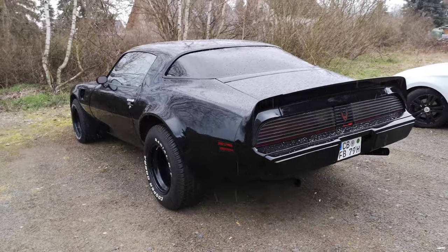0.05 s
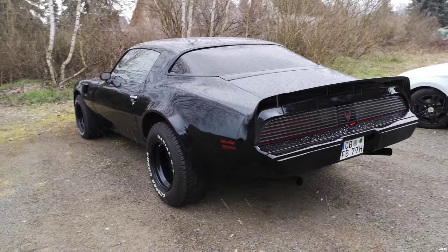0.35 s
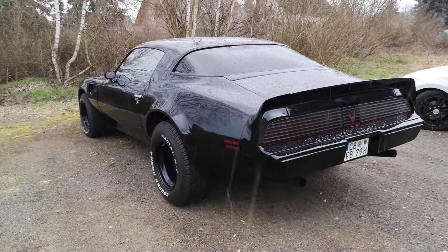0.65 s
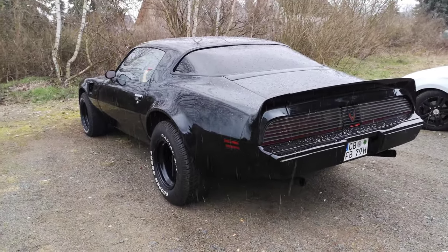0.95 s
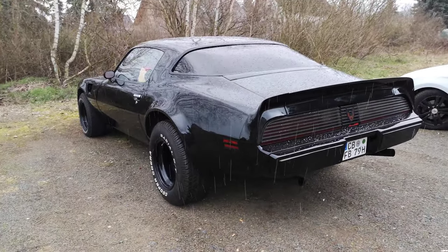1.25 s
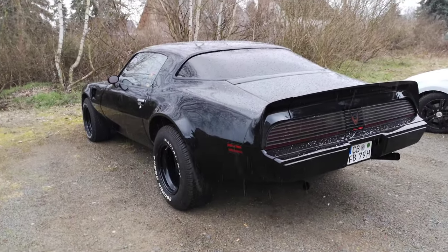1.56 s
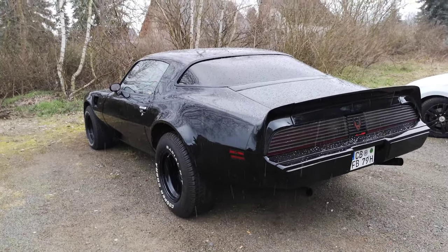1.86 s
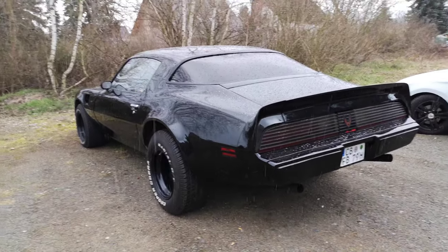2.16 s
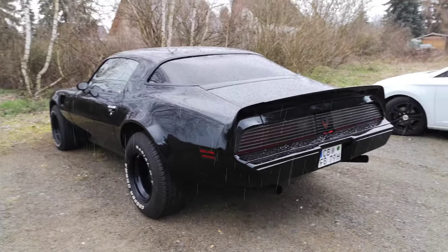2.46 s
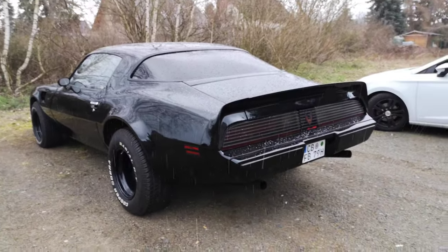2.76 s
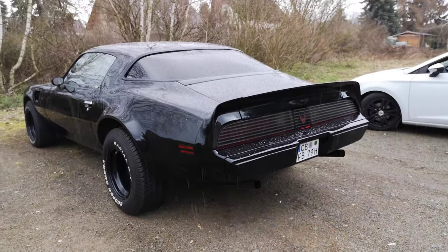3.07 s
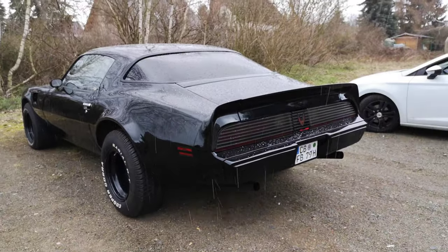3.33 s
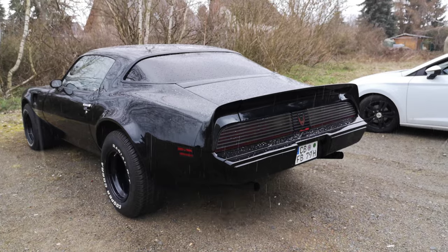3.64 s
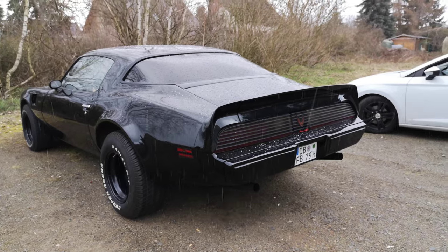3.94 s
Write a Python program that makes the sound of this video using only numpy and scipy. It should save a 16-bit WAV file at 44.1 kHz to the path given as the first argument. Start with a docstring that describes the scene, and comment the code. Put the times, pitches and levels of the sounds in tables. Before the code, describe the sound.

A car starter cranks and the engine fires after light wind gusts outdoors.

```python
"""An old V8 coupe starts up, heard from behind on a wet gravel lot.
Its starter slams in and whines, slowing each time a cylinder squeezes its air. A cylinder catches
with a clank, and the first firings thump and rasp out of the tailpipes. Before the start, gusts
buffet the microphone and a few raindrops tick over faint scuffs, a whirr and outdoor hiss."""
import sys
import numpy as np
from scipy import signal
from scipy.fft import rfft, irfft, next_fast_len
from scipy.io import wavfile
from scipy.ndimage import uniform_filter1d, map_coordinates

SR = 44100
rng = np.random.default_rng(int(sys.argv[2]) if len(sys.argv) > 2 else 0)


def unload_audio(sound):
    """Save the sound as a 16-bit wav file, at the path given as the first command line argument."""
    columns = np.transpose(np.atleast_2d(sound))
    # keep every value between -1 and 1, then stretch to whole-number steps
    steps = np.round(np.clip(columns, -1, 1) * 32767)
    wavfile.write(sys.argv[1], SR, steps.astype(np.int16))


N = 176400
T = np.arange(N) / SR

# A "colour" says how strong each pitch is in a noise. A fade time (t60) is the time to drop 60 dB.
# how fast the starter's gear teeth meet (time [s], tooth rate [Hz])
TOOTH_RATE = [(3.48,450),(3.53,865),(3.58,1100),(3.618,1190),(3.64,1148),(3.672,1030),(3.706,955),(3.746,1105),(3.766,1238),(3.78,1272),(3.802,1225),(3.835,1060),(3.88,1290),(4.0,1400)]
# how hard the starter works (time [s], level [dB])
EFFORT = [(3.475,-100),(3.485,-34.5),(3.54,-30.5),(3.61,-35.5),(3.66,-32),(3.71,-35.5),(3.79,-34.5),(3.83,-33.5),(3.89,-27.5),(4.0,-25.5)]
# the whine swells as each compression loads the teeth (time [s], level [dB])
WHINE_LEVEL = [(3.48,-140),(3.505,-55),(3.535,-40),(3.59,-39.5),(3.62,-39.5),(3.66,-33),(3.71,-39.5),(3.745,-37),(3.785,-36.5),(3.81,-36),(3.84,-32),(3.88,-44),(4.0,-39)]
# the tones in the whine (pitch [times the tooth rate], level [dB])
WHINE_TONES = [(.53,-25),(.74,-24),(.82,-11),(.92,-9.5),(1,-5),(1.09,-13),(1.35,-19),(1.85,-13),(2,-4.5),(2.12,-16),(2.88,-21),(3,-11.5),(4,-26),(5.3,-28)]
# teeth grinding together (pitch [Hz], level [dB])
GRIND_COLOUR = [(180, -51), (300, -48), (422, -30), (455, -29), (569, -3.5), (690, -47), (850, -19.5),
                (1060, -15), (1230, -2), (1350, -13.5), (1610, -8), (1790, -13.5), (2050, -3), (2200, -5),
                (2480, -4.5), (2750, -11), (3650, -12), (4370, -20.5), (5800, -16), (7690, -21),
                (10500, -40), (13700, -52), (22000, -120)]
# ring of the metal housing around the gears (pitch [Hz], level [dB], fade time [s])
HOUSING_RING = [(872,-5,0.1),(1040,-4,0.1),(1235,4,0.03),(1370,-6,0.08),(1660,-2,0.07),(1825,-3,0.07),(1960,9,0.035),(2090,2,0.08),(2467,5,0.09),(2620,4,.06)]
# the starter's small gear slams into the engine's big flywheel (time [s], level [dB], fade time [s])
SLAMS = [(3.4783,-18.5,0.2),(3.502,-17,0.09),(3.632,-35,0.18)]
# the noise of a slam (pitch [Hz], level [dB])
SLAM_COLOUR = [(180, -38), (300, -18), (343, -20), (560, -15), (701, -32), (838, -17), (1470, -11),
               (1660, 1), (1790, 0), (2080, 2.5), (2270, -7), (2480, 3.5), (2880, -17), (4000, -12),
               (4430, -14.5), (7800, -18), (10500, -45), (13700, -51), (22000, -120)]
# ring of the starter's nose after a slam (pitch [Hz], level [dB], fade time [s])
NOSE_RING = [(517,-15,0.21),(581,-14.5,0.22),(876,-15,0.26),(1348,-12,.15),(1672,-5,0.12),(1930,7,0.052),(2103,-1.5,0.13),(2460,-2.5,0.17),(2684,-10,.12),(4000,-14,.14),(5960,-13,.095),(6800,-16,.13)]
# the gears clank as the engine catches (time [s], level [dB], fade time [s])
CLANKS = [(3.8396,-15,0.15),(3.8535,-10.5,0.043)]
# the noise of a clank (pitch [Hz], level [dB])
CLANK_COLOUR = [(180, -47), (300, -25.5), (650, -18), (958, -10.5), (1060, -3), (1350, -3.5), (2020, 2.5),
                (2170, 2), (2410, -13), (2750, -17), (3150, -23), (3440, -35), (3650, -31), (4640, -41),
                (5070, -15), (6630, -20), (7250, -25), (7920, -27), (8280, -21), (9190, -15.5),
                (10500, -36), (13700, -63), (22000, -120)]
# the bright edge of a clank (pitch [Hz], level [dB])
CLANK_EDGE = [(3000, -44), (5000, -10), (9300, -6), (11000, -15), (15000, -18)]
# ring of the flywheel's gear after a clank (pitch [Hz], level [dB], fade time [s])
FLYWHEEL_RING = [(1054,-4,0.062),(1355,-8,.08),(1680,0,.07),(1845,-2,.06),(2060,5,0.089),(2220,-2,.06)]
# how much louder the engine bay is on the left (pitch [Hz], left minus right [dB])
BAY_BALANCE = [(200,-8),(550,1.5),(1030,8),(1800,6),(3200,0),(5700,5),(10000,4)]

# the engine shakes as it turns over (time [s], level [dB])
SHUDDER_LEVEL = [(3.495,-85),(3.515,-28),(3.56,-26.5),(3.62,-32),(3.665,-27.5),(3.72,-35.5),(3.8,-35.5),(3.85,-35.5),(3.92,-31),(4.0,-14)]
# the rumble of that shaking (pitch [Hz], level [dB])
SHUDDER_COLOUR = [(20,-7),(42,9.5),(75,-1.5),(120,-2.5),(170,-2),(230,-9),(320,-45),(420,-28.5),(530,-29.5),(700,-52),(1200,-93)]
# firings leave the tailpipes (time [s], thump level [dB], bark level [dB], hiss level [dB])
FIRINGS = [(3.9005,-18,-38,-34),(3.928,-6,-23.5,-22),(3.9516,-0.5,-16.5,-16),(3.974,-3,-17.5,-15.5),(3.9948,-1.5,-17.5,-18)]
# the low bark of a firing (pitch [Hz], level [dB])
BARK_COLOUR = [(120,5),(230,4.5),(330,-10),(480,-18),(640,-24),(720,-5),(860,1.5),(1050,-16.5),(1600,-4),(2400,-5.5),(3100,-5),(4000,-22),(6000,-40)]
# the hiss of escaping gas (pitch [Hz], level [dB])
GAS_COLOUR = [(1000,-50),(4100,-27),(4700,-4),(5500,-3.5),(5880,4.5),(6400,-10),(7300,-9.5),(8300,-4.5),(9000,-17),(10200,-17.5),(11500,-31.5),(15000,-36)]
# ring of the tailpipes (pitch [Hz], level [dB], fade time [s])
PIPE_RING = [(851,1,0.054),(1594,2,0.035),(1703,-3,.05),(1950,-5.5,.06),(2340,1,.06),(2650,0.5,0.052)]
# the crack of fuel popping in the pipe (pitch [Hz], level [dB])
POP_COLOUR = [(300,-29),(800,2),(1100,-2),(1600,14),(2500,-8),(6000,-7),(14000,-36)]
# ring of the pipe after the pop (pitch [Hz], level [dB], fade time [s])
POP_RING = [(830,-9.5,.025),(1587,1,0.024),(1790,-16.5,0.02),(4640,-9,0.016)]

# wind on the microphone (time [s], level [dB])
GUSTS = [(0.0, -47.5), (0.15, -47), (0.5, -52), (0.8, -25.5), (0.82, -39), (0.85, -29), (0.89, -30.5),
         (0.94, -44), (0.97, -36.5), (1.21, -53), (1.28, -44), (1.63, -54.5), (1.78, -35.5), (1.83, -56),
         (1.86, -30.5), (1.94, -31), (2.01, -37), (2.04, -25.5), (2.09, -40), (2.12, -30), (2.16, -49.5),
         (2.22, -29), (2.46, -47.5), (2.51, -54), (2.69, -53), (2.74, -29.5), (2.78, -35.5), (2.83, -34),
         (2.88, -52), (3.45, -49)]
# the deep rumble of that wind (pitch [Hz], level [dB])
GUST_COLOUR = [(20,3),(35,9),(55,2.5),(100,-2.5),(160,-14),(230,-40),(350,-62),(600,-75),(2600,-120)]
# strong gusts swirl (time [s], level [dB], half length [s])
SWIRLS = [(0.736,-32,0.017),(0.79,-34,0.032),(0.862,-32,0.026),(0.986,-45,0.037),(1.914,-43,0.034),(2.06,-52,0.028),(2.234,-45.5,0.028),(2.749,-39,0.021)]
# the brighter noise of a swirl (pitch [Hz], level [dB])
SWIRL_COLOUR = [(40,-11),(100,2.5),(170,-1.5),(240,-11),(350,-24.5),(480,-33.5),(700,-46),(2000,-100)]
# eddies, small whirls of air, slap the microphone (time [s], level [dB], half length [s])
EDDIES = [(0.7386,-20,0.0027),(0.7502,-21.5,.0015),(0.779,-25,0.0022),(0.793,-19,0.0028),(0.8484,-19,0.0012),(0.8757,-29.5,0.0012),(0.968,-33.5,0.0018),(1.947,-20.5,0.0028),(2.042,-26,0.0021),(2.2061,-25.5,0.0021),(2.2113,-26.5,0.0015),(2.74,-22,0.0024)]
# raindrops close by (time [s], level [dB], pitch [Hz], fade time [s])
DROPS = [(0.1621,-29,3320,0.0068),(1.2253,-27.5,1890,0.0028),(1.3184,-46,6000,.001),(2.6867,-37,3200,0.0014),(2.8404,-40.5,7240,0.0017),(3.3990,-33,3400,0.00068)]
# soft scuffs on the gravel (time [s], level [dB], fade time [s])
SCUFFS = [(.25,-57,0.15),(.58,-63,.3)]
# the noise of a scuff (pitch [Hz], level [dB])
SCUFF_COLOUR = [(600,-32),(1250,-10),(1650,5),(2100,-16),(4000,-36)]
# outdoor hiss rises and falls (time [s], level [dB])
AIR_LEVEL = [(0.22,-64.5),(0.42,-66),(0.56,-66),(0.62,-62),(0.9,-61),(1.17,-65.5),(1.35,-64.5),(1.6,-65.5),(1.85,-64),(2.02,-60.5),(2.24,-62.5),(2.38,-61.5),(2.52,-66.5),(2.68,-65.5),(2.84,-60.5),(2.88,-65.5),(3.45,-64.5)]
# the noise of that hiss (pitch [Hz], level [dB])
AIR_COLOUR = [(240, -8), (400, -8.5), (452, -13), (498, -8), (654, -7), (826, -11), (973, -6), (1060, -7),
              (1210, -7), (1470, -11.5), (1660, -7.5), (1800, -11.5), (1980, -4), (2150, -14.5),
              (2300, -10), (2500, -13.5), (3570, -18.5), (4500, -17.5), (6510, -24), (7670, -19.5),
              (10500, -31), (13700, -44), (22000, -120)]
# a brief soft rustle (pitch [Hz], level [dB])
RUSTLE_COLOUR = [(240, -19), (400, 0.5), (452, -11), (691, -3.5), (1780, -3.5), (2370, -6.5), (5090, -11.5),
                 (10500, -22), (13700, -31), (22000, -120)]
# distant rumble (pitch [Hz], level [dB])
RUMBLE_COLOUR = [(25,-4.5),(50,7.5),(110,-0.5),(180,2),(250,-9),(350,-26),(700,-46.5)]
# a faint, fluttering whirr (pitch [Hz], level [dB])
WHIRR_COLOUR = [(1000,-30),(1850,-10),(2050,-1),(2300,-7.5),(2700,-14),(4000,-20),(4600,-12.5),(5300,-19.5),(9000,-43)]


def starter():
    """Gear teeth whine and grind; together with the knocks they make the housing ring."""
    teeth = np.cumsum(curve(TOOTH_RATE) * (1 + 0.008 * wobble(220))) / SR  # teeth passed so far
    effort = amp(curve(EFFORT))
    tones = sum(amp(db + 4 * wobble(90)) * np.sin(2 * np.pi * (multiple * teeth + rng.random()))
                for multiple, db in WHINE_TONES)
    whine = amp(curve(WHINE_LEVEL)) * tones
    contact = unit((1 + np.cos(2 * np.pi * teeth)) * amp(0.94 * wobble(260)))  # one pulse per tooth
    grind = effort * amp(-5) * contact * noise(GRIND_COLOUR, alike=0.17)
    slam, clank = blows(SLAMS, rise_s=0.0062), blows(CLANKS, rise_s=0.0059)
    shaking = effort * amp(-2) * rng.standard_normal(N) + amp(-12) * whine
    shaking += (amp(-14.5) * slam + amp(-23.5) * clank) * rng.standard_normal(N)
    gears = grind + underbody(whine, t60=0.073, echo_db=-1.5)
    bay = gears + knocks(slam, clank) + housing(shaking)
    bay = filtered(bay, lambda hz: pan(1, left_db=at_pitch(BAY_BALANCE, hz)))
    return left_first(bay, by_s=0.0001)


def knocks(slam, clank):
    """Gears hit each other: bursts of noise, and a ring from the starter's nose or the flywheel."""
    bursts = slam * noise(SLAM_COLOUR, alike=0.25) + clank * noise(CLANK_COLOUR, alike=0.36)
    edge = amp(-22) * clank * noise(CLANK_EDGE, alike=0.2)
    nose = sum(amp(db - 5) * struck(s, NOSE_RING, rise_s=0.0039) for s, db, _ in SLAMS)
    flywheel = sum(amp(db - 11) * struck(s, FLYWHEEL_RING, rise_s=0.0062) for s, db, _ in CLANKS)
    return bursts + edge + nose + flywheel


def housing(shaking, top_hz=5500):
    """The heavy metal housing rings when shaken, but lets little treble through."""
    return filtered(ringing(shaking, HOUSING_RING), lambda hz: 1 / (1 + (hz / top_hz) ** 4))


def engine_shake(lurch_s=3.508, lurch_hz=171, lurch_db=-19, lurch_t60=0.18):
    """The engine lurches as the starter takes hold, then shakes on its mounts as it turns over."""
    lurch = struck(lurch_s, [(lurch_hz, lurch_db, lurch_t60)], rise_s=0.0043).mean(0)
    rumble = steadied(noise(SHUDDER_COLOUR, alike=0.99), span_s=0.027)
    return lurch + amp(curve(SHUDDER_LEVEL)) * rumble


def exhaust(echo_s=0.0072, echo_db=-5.5, bark_delay_s=0.00047, hiss_delay_s=0.0028):
    """Each firing is a thump that echoes once along the pipe, a ringing bark and a hiss of gas."""
    thumps, bark, hiss = np.zeros((3, N))
    for s, thump_db, bark_db, hiss_db in FIRINGS:
        t = T - s
        thumps += amp(thump_db) * (thump(t) + amp(echo_db) * thump(t - echo_s))
        bark += amp(bark_db) * puff(t - bark_delay_s)
        hiss += amp(hiss_db) * puff(t - hiss_delay_s)
    sputter = unit(amp(3 * wobble(700)))  # the gas leaves in uneven spurts
    gas = bark * noise(BARK_COLOUR, alike=0.89) + pan(hiss * noise(GAS_COLOUR, alike=0.51), left_db=3.5)
    rasp = underbody(sputter * gas, t60=0.12, echo_db=-10)
    pipes = ringing(amp(-3) * bark * rng.standard_normal(N), PIPE_RING)
    return thumps + left_first(rasp + pipes + pan(pop(), left_db=2.5), by_s=-0.000039)


def thump(t, dip_s=0.0023, rebound_s=0.011):
    """The air pressure dips sharply inside a broad, gentle rebound."""
    return dip_s / rebound_s * bump(t, rebound_s) - bump(t, dip_s)


def puff(t, rise_s=0.0036, fall_s=0.0037):
    """The flow of escaping gas swells and falls."""
    return bump(t, np.where(t < 0, rise_s, fall_s))


def pop(start_s=3.9683, crack_db=-10, crack_t60=0.045):
    """Unburnt fuel goes off in the pipe: a crack and a short ring."""
    t = np.maximum(T - start_s, 0)
    ring = sum(amp(db - 60 * t / t60) * np.sin(2 * np.pi * hz * t) for hz, db, t60 in POP_RING)
    crack = blows([(start_s, crack_db, crack_t60)], rise_s=0.00028) * noise(POP_COLOUR, alike=0.84)
    return amp(-6) * ring + crack


def underbody(x, t60, echo_db):
    """Add the quick echoes that bounce between the car's floor and the ground."""
    t = T[:SR // 4]
    tail = rng.standard_normal((2, len(t))) * amp(-60 * t / t60)
    tail /= np.linalg.norm(tail[0])
    return x + amp(echo_db) * signal.fftconvolve(np.atleast_2d(x), tail, axes=1)[:, :N]


def wind():
    """Gusts rumble on the microphone, and strong ones add a brighter swirl."""
    gust_db = np.minimum(curve(GUSTS), -23.5) + 1
    buffet = amp(gust_db) * steadied(noise(GUST_COLOUR, alike=0.96), span_s=0.0399)
    swells = sum(amp(db) * bump(T - s, half_s) for s, db, half_s in SWIRLS)
    return buffet + swells * steadied(noise(SWIRL_COLOUR, alike=0.38), span_s=0.011)


def eddies():
    """Each passing whirl of air pulls and then pushes on the microphone."""
    out = np.zeros(N)
    for s, db, half_s in EDDIES:
        position = (T - s) / half_s
        out += amp(db) * position * np.exp((1 - position ** 2) / 2)
    return out


def rain(spray_t60=0.015):
    """Each drop lands with a tiny tick and a faint spray."""
    out, t = np.zeros(N + SR), T[:2048]
    for s, db, hz, t60 in DROPS:
        tick = np.sin(2 * np.pi * hz * t) * amp(-60 * t / t60) * (1 - np.exp(-t * hz))
        spray = 2 * rng.standard_normal(len(t)) * amp(-25.5 - 60 * t / spray_t60)
        near_pitch = signal.butter(2, [hz / 2, min(2 * hz, SR / 3)], "bandpass", fs=SR, output="sos")
        out[round(s * SR):][:len(t)] += amp(db) * (tick + signal.sosfilt(near_pitch, spray))
    return pan(out[:N], left_db=8)


def scuffs():
    """Faint, dull scuffs on the gravel."""
    return blows(SCUFFS, rise_s=0.0094) * noise(SCUFF_COLOUR, alike=0.44)


def outdoors(rustle_end_s=0.223, rustle_fade_s=0.037):
    """Soft hiss and distant rumble, with a brief rustle at the very start."""
    hiss = amp(curve(AIR_LEVEL) + 1 + 0.1 * wobble(12)) * noise(AIR_COLOUR, alike=0.02)
    fade_out = np.clip((rustle_end_s - T) / rustle_fade_s, 0, 1)
    rustle = amp(-59.5) * fade_out * noise(RUSTLE_COLOUR, alike=0.15)
    return hiss + rustle + amp(-56) * noise(RUMBLE_COLOUR, alike=0.95)


def whirr(level_db=-72, flutter_hz=23.2):
    """A thin hiss that pulses evenly and swells along with the outdoor hiss."""
    swell_db = curve(AIR_LEVEL) - curve(AIR_LEVEL).mean()
    flutter = unit((1 + np.cos(2 * np.pi * flutter_hz * T)) ** 2)
    return amp(level_db + swell_db) * flutter * noise(WHIRR_COLOUR, alike=0.11)


def amp(db):
    """Turn decibels into a number to multiply by."""
    return 10 ** (np.asarray(db) / 20)


def unit(x):
    """Scale a signal so its average strength (rms) is 1."""
    return x / np.sqrt(np.mean(x ** 2) + 1e-20)


def at_pitch(rows, hz):
    """Read between (pitch, value) rows, with octaves about evenly spaced."""
    pitches, values = np.transpose(rows)
    return np.interp(np.log(hz + 1), np.log(pitches + 1), values)


def curve(rows):
    """Join (time, value) rows with straight lines, one value per sample."""
    return np.interp(T, *np.transpose(rows))


def bump(t, half_s):
    """A smooth hill that peaks at t = 0."""
    return np.exp(-0.5 * (t / half_s) ** 2)


def wobble(rate):
    """A smooth curve through `rate` random values a second."""
    return map_coordinates(rng.standard_normal(int(N * rate / SR) + 4), [T * rate])


def filtered(x, response):
    """Multiply each pitch in x by response(hz)."""
    size = next_fast_len(N + SR // 2)
    return irfft(rfft(x, size) * response(np.fft.rfftfreq(size, 1 / SR)), size)[..., :N]


def noise(colour, alike):
    """Stereo noise; `alike` runs from 0 (left and right unrelated) to 1 (the same)."""
    mid, side = filtered(rng.standard_normal((2, N)), lambda hz: amp(at_pitch(colour, hz)))
    side = side * np.tan(np.arccos(np.clip(alike, 0, 1)) / 2)
    return unit(np.array([mid + side, mid - side]))


def steadied(x, span_s):
    """Even out the slow swells in a noise."""
    power = uniform_filter1d(np.mean(x ** 2, 0), max(8, int(span_s * SR)))
    return x / np.sqrt(np.abs(power) + 1e-4)


def pan(x, left_db):
    """Make the left side left_db louder than the right."""
    return x * amp(left_db * np.array([[0.5], [-0.5]]))


def left_first(x, by_s):
    """Let the sound reach the left side first (the right, if by_s is negative)."""
    return filtered(x, lambda hz: np.exp(1j * np.pi * hz * by_s * np.array([[1], [-1]])))


def blows(rows, rise_s):
    """The loudness curve of (time, level, fade time) hits that swell quickly and die away."""
    ages = [(np.maximum(T - s, 0), db, t60) for s, db, t60 in rows]
    hits = [amp(db - 60 * t / t60) * (1 - np.exp(-(t / rise_s) ** 2)) for t, db, t60 in ages]
    return np.sqrt(sum(hit ** 2 for hit in hits))


def struck(start_s, tones, rise_s):
    """One hit sets off fading tones, each a little out of step between left and right."""
    t = np.maximum(T - start_s, 0)
    ring = 0
    for hz, db, t60 in tones:
        cycles = hz * t + rng.random() + rng.random((2, 1)) / 4
        ring += amp(db - 60 * t / t60) * np.sin(2 * np.pi * cycles)
    return ring * (1 - np.exp(-(t / rise_s) ** 2))


def ringing(x, tones):
    """Metal shaken by x rings at its own tones, as strongly as it is shaken."""
    t = T[:SR // 3]
    ring = sum(amp(db - 60 * t / t60) * np.sin(2 * np.pi * (hz * t + rng.random((2, 1)) / 2))
               for hz, db, t60 in tones)
    return unit(signal.fftconvolve(x[None], ring, axes=1)[:, :N]) * x.std()


def scene():
    """The car starts against the weather and the background."""
    background = wind() + outdoors() + whirr() + eddies() + rain() + scuffs()
    return starter() + engine_shake() + exhaust() + background


def record(dry):
    """Round off the highest peaks and cut the very top of the treble."""
    top_hz = 15400
    rounded = dry / (1 + np.abs(dry) ** 8) ** (1 / 8)
    return filtered(rounded, lambda hz: hz < top_hz)


dry = scene()
out = record(dry)
unload_audio(out)
```